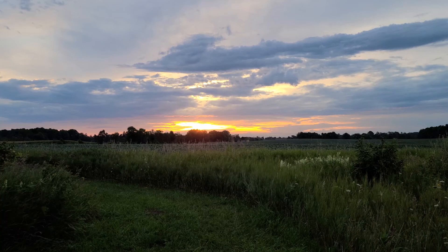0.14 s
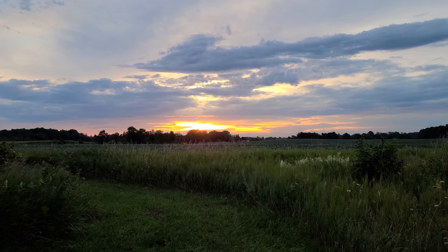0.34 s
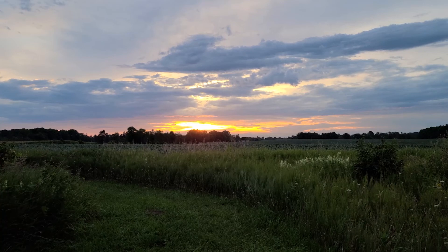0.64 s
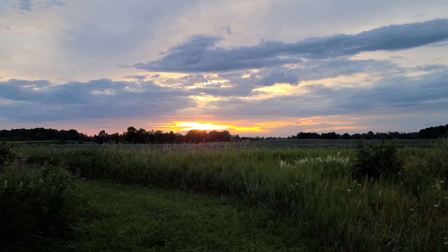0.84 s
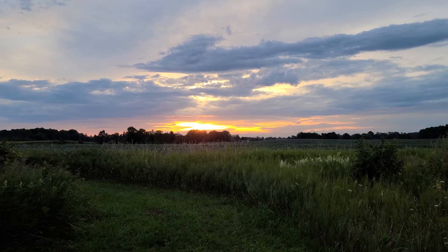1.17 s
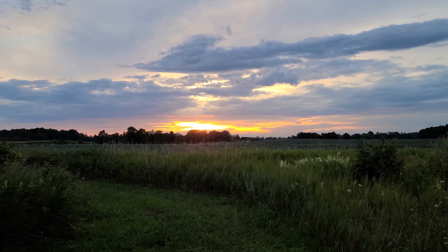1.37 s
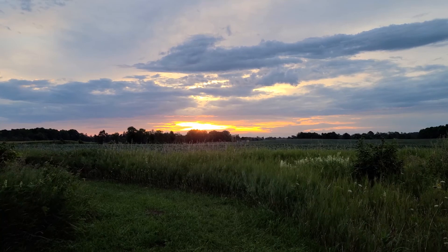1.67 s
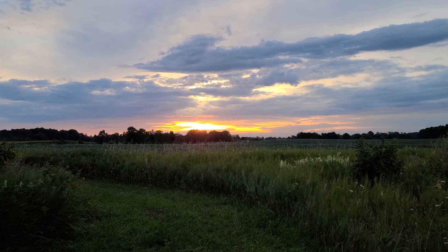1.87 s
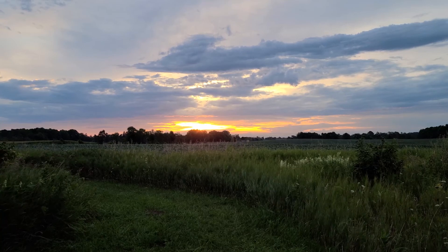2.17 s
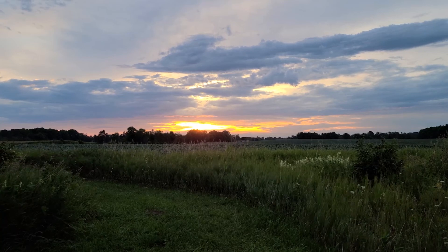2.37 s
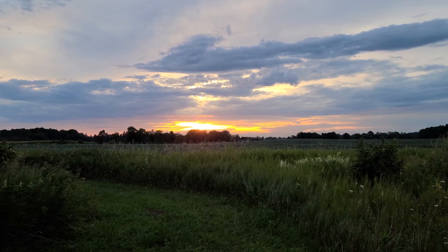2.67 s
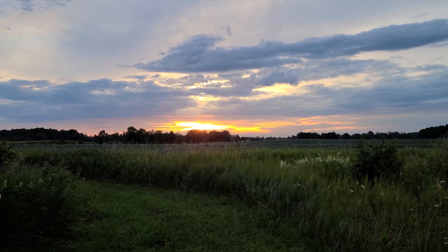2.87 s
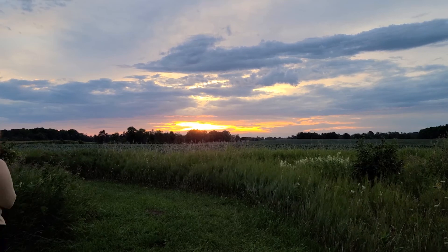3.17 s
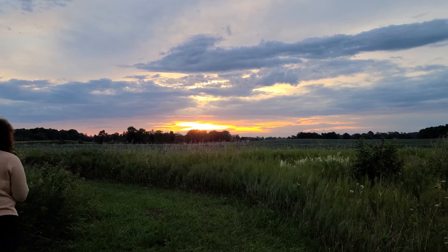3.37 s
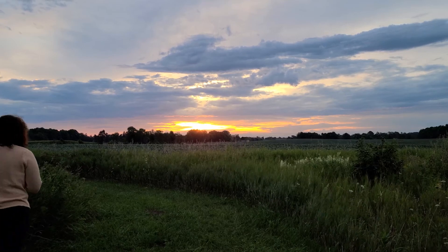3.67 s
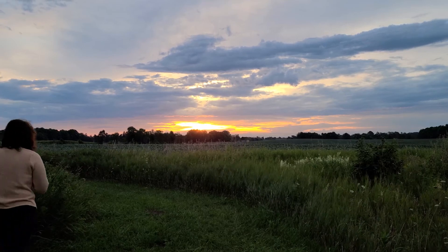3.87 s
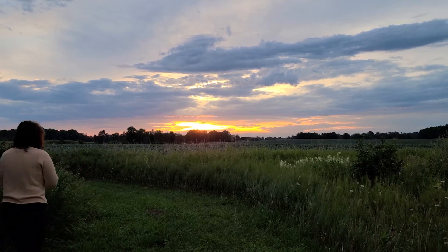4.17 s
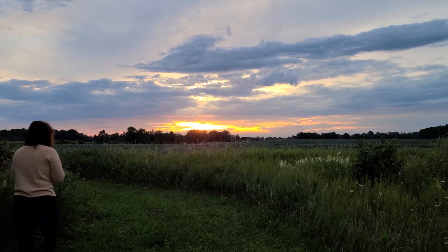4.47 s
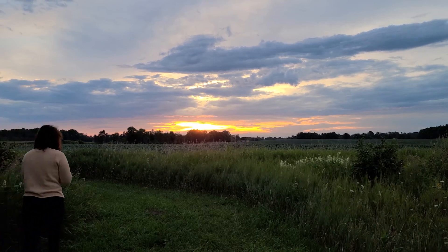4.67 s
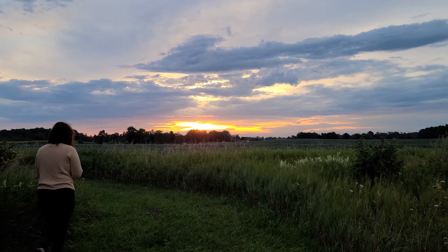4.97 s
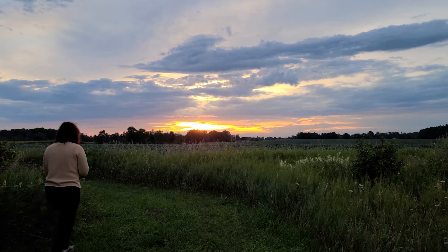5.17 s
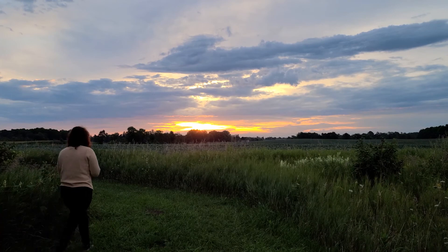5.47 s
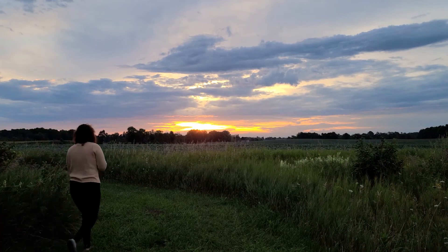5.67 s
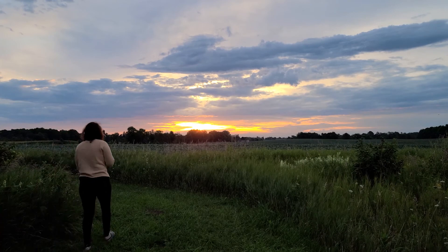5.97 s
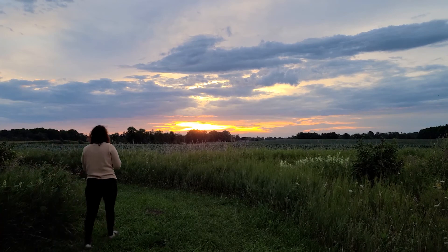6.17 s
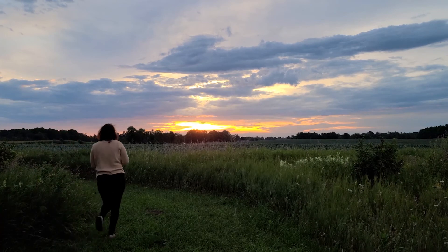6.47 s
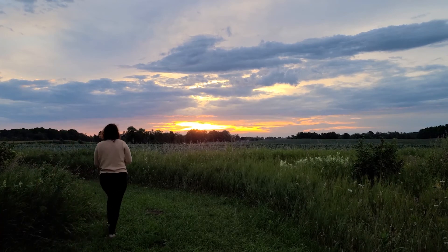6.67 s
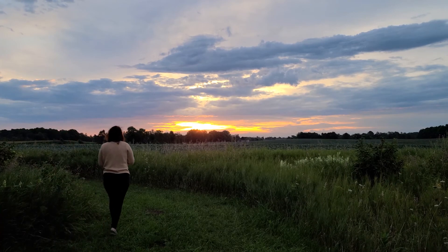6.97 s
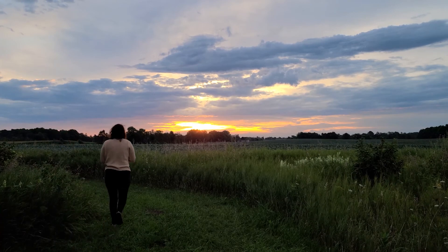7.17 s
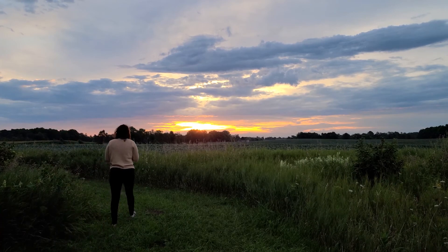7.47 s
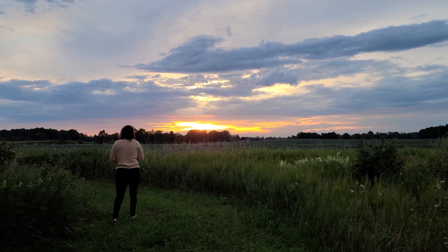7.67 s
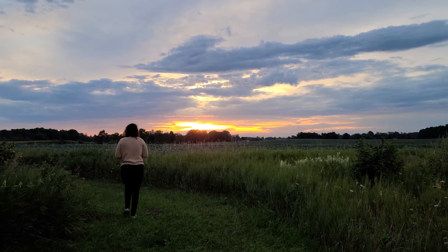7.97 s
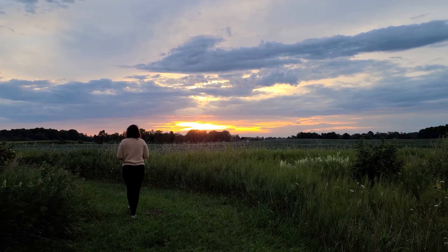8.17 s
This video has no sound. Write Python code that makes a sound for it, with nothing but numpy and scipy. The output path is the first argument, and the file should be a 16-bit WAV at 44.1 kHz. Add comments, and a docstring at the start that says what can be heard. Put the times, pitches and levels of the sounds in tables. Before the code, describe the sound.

Wind buffets the microphone in an open meadow throughout, a low, uneven rumble shifting between left and right. It thumps in the first half second, around 1.6 and 2.6 seconds, most strongly near 3.4, and again near 5 and 6.7. Distant birds start with quick falling chirps at about 2.3 seconds. A nearer sparrow sings two low-high whistled pairs at 3.7 and 4.2 seconds, a buzz at 4.6, then sharp notes and a quick trill ending near 5.8. Farther chips and twitters continue, growing busier from 7 seconds to the end, just past 8. Crickets pulse faintly and high all along. Very soft footsteps brush through grass, with a small dry stalk snap near 5 seconds. Behind everything lies a quiet wash of far traffic and leaves, with a faint wavering hum that swells around 4 and 4.5 seconds.

```python
"""Wind rumbles and thumps on two microphone ports, in an open meadow at dusk.
Eddies press on each port apart. A sparrow whistles, trills and buzzes on the right;
farther birds sweep and chip. Two crickets throb with wing strokes near 6 kHz, and someone
walks away on the left, bending grass and snapping stalks. Behind it all lie far traffic,
leaves, a blur of song and insects, and a wavering drone."""
import sys
import numpy as np
from scipy import signal
from scipy.fft import rfft, irfft
from scipy.io import wavfile
from scipy.ndimage import uniform_filter1d

SR = 44100
rng = np.random.default_rng(int(sys.argv[2]) if len(sys.argv) > 2 else 0)


def materialize(psi):
    """Save the field psi as 16-bit PCM at rate SR to the path in sys.argv[1].

    A 1-D psi becomes a single channel; in a 2-D psi each row is a channel.
    """
    bounded = np.clip(np.atleast_2d(psi).T, -1, 1)
    quanta = np.round(bounded * 32767).astype(np.int16)
    wavfile.write(sys.argv[1], SR, quanta)


N = 366912
TIME_S, BIN_HZ = np.arange(N) / SR, np.arange(N // 2 + 1) * SR / N

# gust strength: (time [s], level [dB], left minus right [dB])
GUSTS = [(0, -31.5, 5.5), (.45, -37, 0.5), (.56, -45.5, -5), (.86, -48, 0.5), (1, -43, 6), (1.5, -42.5, 2),
         (1.7, -39, 3), (2.7, -36.5, 4.5), (3.35, -31.5, -4.5), (3.6, -35, -4.5), (4.9, -40.5, 3.5),
         (5.2, -44, 2.5), (5.8, -37, -2), (6.25, -39, 3), (6.65, -33, -2), (6.85, -41.5, -1),
         (7.4, -39, 1.5), (7.5, -44.5, 2), (8.32, -42.5, -1)]
# buffeting spectrum: (frequency [Hz], density [dB])
BUFFET_SPECTRUM = [(12, -18), (30, -2.5), (60, 1.5), (85, -2), (125, -14.5), (190, -39), (400, -70.5)]
# fine eddies: (time [s], level [dB])
FLUTTER_LEVELS = [(0, -53), (.7, -62), (1.15, -48.5), (1.7, -55), (3.35, -57.5), (4.9, -65.5), (5.6, -60),
                  (8.32, -66.5)]
# single big eddies: (time [s], peak [dB], left minus right [dB])
BIG_EDDIES = [(0.096, -27.5, -14.5), (0.195, -26.5, -9), (0.404, -24, 1), (1.605, -28, 2), (2.642, -23, 8),
              (3.119, -26.5, -15), (3.317, -22.5, 16), (3.4, -20, -8), (3.85, -31, 19), (4.05, -30.5, 12),
              (4.944, -26, 5.5), (4.996, -25, -1), (6.695, -24.5, -4.5)]


def wind():
    """Bunched eddies press on each port; big ones thump, a finer flutter rides above."""
    gust_db, pan_db = curve(GUSTS)
    flutter_db, = curve(FLUTTER_LEVELS)
    shared = rng.standard_normal(N)
    bunching = undb(3.3 * walk(24))
    ports = []
    for side in (.5, -.5):
        eddies = (rng.standard_normal(N) + .4 * shared) * bunching
        rumble = unit(colour(eddies, BUFFET_SPECTRUM)) * undb(gust_db + side * pan_db)
        flutter_gain = undb(flutter_db + side * pan_db)
        for s, peak_db, balance_db in BIG_EDDIES:
            phase, thump_hz = rng.random(), rng.uniform(56, 86)
            span = slice(max(int((s - .1) * SR), 0), int((s + .2) * SR))
            t = TIME_S[span]
            push = undb(peak_db + side * balance_db) * bell(t - s - .015, .02)
            rumble[span] += push * np.sin(2 * np.pi * (thump_hz * t + phase))
            flutter_gain[span] += undb(-30) * push
        ports.append(rumble + flutter_gain * resonate(eddies, hz=162, width_hz=142))
    return np.array(ports)


# single whistles: (time [s], length [s], start [Hz], end [Hz], level [dB])
SPARROW_NOTES = [(3.28, 0.1, 6680, 7140, -58.5), (4.883, 0.0092, 4720, 5400, -49.5),
                 (4.886, 0.051, 4090, 3570, -46.5), (4.909, 0.019, 3640, 2840, -40),
                 (4.938, 0.029, 4900, 4870, -43), (4.969, 0.082, 6670, 7320, -52.5),
                 (5.602, 0.027, 3290, 1960, -57.5), (5.669, 0.038, 5800, 6400, -47),
                 (5.698, 0.074, 6120, 6350, -42.5)]
# low-high opening: (delay [s], length [s], start [Hz], end [Hz], level [dB])
OPENING_NOTES = [(-.005, 0.17, 2815, 2785, -50), (0.22, 0.0143, 4830, 6000, -52.5),
                 (0.225, 0.11, 5586, 5600, -44.5)]
# opening onsets: (time [s])
OPENINGS_S = [3.7, 4.158]
# trill syllable: (delay [s], length [s], start [Hz], end [Hz], level [dB])
TRILL_NOTES = [(-.007, 0.0075, 5160, 4850, -54.5), (0, 0.022, 4277, 4020, -45.5),
               (0.016, 0.078, 4180, 4090, -53), (0.018, 0.0204, 3510, 2880, -61.5),
               (0.086, 0.014, 7950, 7200, -58), (0.11, 0.07, 7800, 6900, -65)]


def sparrow():
    """The nearest bird: clear whistles, buzzes, hoarse top notes and a five-syllable trill."""
    trill_s, period_s, hoarse_above_hz = 5.0448, .1223, 6500
    trill = repeat(trill_s + period_s * np.arange(5), TRILL_NOTES)[:-2]  # last syllable breaks off
    low = [note for note in SPARROW_NOTES if note[2] <= hoarse_above_hz]
    high = [note for note in SPARROW_NOTES if note[2] > hoarse_above_hz]
    clear = whistle(low + repeat(OPENINGS_S, OPENING_NOTES), flutter_db=.63, taper=.55, rasp=0)
    hoarse = whistle(high + trill, flutter_db=1, taper=.97, rasp=.55)
    return place(clear + hoarse + buzz(), lag_ms=.41, pan_db=-.5, wet_db=-5.5, t60_s=.28)


# buzzed notes: (time [s], length [s], centre [Hz], resonance width [Hz], level [dB])
BUZZ_NOTES = [(3.106, 0.12, 3230, 725, -63.5), (3.71, 0.13, 2430, 250, -68), (4.138, 0.18, 2370, 250, -69),
              (4.581, 0.25, 4700, 840, -53.5), (4.592, 0.26, 3670, 613, -56.5),
              (6.985, 0.064, 6270, 400, -58), (8.227, 0.11, 3100, 1000, -61.5)]


def buzz():
    """Uneven noise pulses, about 140 a second, ring the sparrow's wide throat resonance."""
    out, ramp_s = 0, .023
    for s, length_s, hz, width_hz, db in BUZZ_NOTES:
        pulses = np.sqrt(.5 + .5 * np.cos(radians(140 + 12 * walk(30))))
        voice = resonate(pulses * rng.standard_normal(N), hz, width_hz)
        envelope = np.clip(np.minimum(TIME_S - s, s + length_s - TIME_S) / ramp_s, 0, 1)
        out += undb(db) * envelope * voice
    return out


# downward slides: (time [s], end [Hz], level [dB])
SWEEP_NOTES = [(2.42, 3180, -59), (2.558, 2780, -61), (2.673, 3600, -62.5), (7.111, 3320, -57.5),
               (7.16, 3600, -65), (7.243, 2900, -61.5), (7.36, 3700, -66.5)]
# short calls: (time [s], length [s], start [Hz], end [Hz], level [dB], side [left/right])
TWITTER_NOTES = [(2.291, 0.019, 3320, 2930, -60.5, "right"), (2.511, 0.042, 3500, 4000, -65.5, "left"),
                 (2.732, 0.05, 5050, 4580, -68, "right"), (2.85, 0.035, 4200, 3370, -63.5, "left"),
                 (2.811, 0.022, 4900, 4370, -66, "right"), (3.589, 0.011, 4080, 2930, -61, "left"),
                 (4.09, 0.026, 3350, 4350, -67, "left"), (6.974, 0.021, 3290, 2780, -63, "right"),
                 (7.423, 0.037, 2780, 4600, -65.5, "right"), (7.582, 0.045, 2560, 2480, -62, "right"),
                 (7.65, 0.13, 2300, 2270, -69.5, "right"), (7.661, 0.055, 4070, 3100, -60.5, "left"),
                 (7.684, 0.026, 7470, 6200, -62, "right"), (7.817, 0.064, 2550, 4900, -64, "left"),
                 (7.842, 0.052, 2970, 5180, -62.5, "left"), (8.056, 0.023, 4300, 3600, -63, "left"),
                 (8.071, 0.012, 8000, 7250, -63, "right"), (8.078, .017, 3680, 4260, -61, "left"),
                 (8.154, 0.011, 3050, 3750, -60.5, "left"), (8.233, 0.014, 2800, 3800, -61.5, "left")]
# onsets of four-chip runs: (time [s])
CHIP_ONSETS_S = [3.5574, 4.1187, 5.633, 6.08, 6.6172, 7.0684, 7.649]


def far_birds():
    """Sweeps, twitters and falling chips, with more scatter than the sparrow."""
    top_hz, fall_hz_per_s = 5010, 31000
    sweeps = [(s, (top_hz - hz) / fall_hz_per_s, top_hz, hz, db) for s, hz, db in SWEEP_NOTES]
    chip_period_s, chip_db, fade_db = .046, -60.5, 2
    run = [(k * chip_period_s, .018, 4930, 4420, chip_db - k * fade_db) for k in range(4)]
    right = [note[:-1] for note in TWITTER_NOTES if note[-1] == "right"]
    left = [note[:-1] for note in TWITTER_NOTES if note[-1] == "left"]
    right_song = whistle(sweeps + right, flutter_db=2, taper=.33)
    out = place(right_song, lag_ms=.4, pan_db=-1.2, wet_db=-1.5, t60_s=.3)
    left_song = whistle(left, flutter_db=1.65, taper=.11)
    out += place(left_song, lag_ms=.32, pan_db=3.8, wet_db=-1.5, t60_s=.25)
    chips = whistle(repeat(CHIP_ONSETS_S, run), flutter_db=1.4, taper=.45)
    return out + place(chips, lag_ms=.28, pan_db=-.72, wet_db=-1.5, t60_s=.26)


# two crickets: (chirp rate [1/s], start phase [cycles], pitch [Hz])
CRICKET_VOICES = [(11.95, .75, 6170), (11.96, .1, 6380)]
# their loudness: (time [s], first [dB], second [dB])
CRICKET_LEVELS = [(0, -74, -92), (3, -74.5, -84), (4.5, -75, -75), (5.6, -84, -74.5), (7, -78, -73),
                  (7.5, -73, -73), (8.32, -72.5, -73)]


def crickets():
    """Each chirp is a few wing strokes that sag in pitch."""
    out = 0
    for (rate_hz, phase, hz), db in zip(CRICKET_VOICES, curve(CRICKET_LEVELS)):
        cycle = (rate_hz * TIME_S + phase + .5) % 1 - .5
        strokes = bell(cycle, .12) * (1 + .6 * np.cos(2 * np.pi * 14 * cycle))
        tone = np.sin(radians(hz - 900 * cycle + 25 * walk(25) + 90 * walk(300)))
        chirps = unit(strokes * tone) * undb(db + 1.2 * walk(15))
        out += place(chirps, lag_ms=.43, pan_db=-1, wet_db=.5, t60_s=.09)
    return out


# feet brushing grass: (peak time [s], length [s], level [dB])
FOOTSTEPS = [(0.643, 0.47, -74.5), (1.524, 0.075, -65), (2.32, 0.2, -70.5), (3.095, 0.12, -75),
             (3.953, 0.25, -75.5), (4.545, 0.077, -73), (4.66, 0.99, -79), (5.317, 0.41, -76.5),
             (6.016, 0.15, -71.5), (6.726, 0.071, -74), (7.39, 0.071, -71.5)]
# dry stalks breaking: (time [s], peak [dB])
STALK_SNAPS = [(2.374, -61), (4.991, -47)]
# grass spectrum: (frequency [Hz], density [dB])
GRASS_SPECTRUM = [(500, -7), (2000, -2), (4000, 0), (9000, -6.5), (12500, -7), (16000, -10)]


def walker():
    """Bending blades crackle at each step, over a rustle that fades with distance."""
    effort = undb(-78.5 - .57 * TIME_S + 1.5 * walk(1.89))
    for s, length_s, db in FOOTSTEPS:
        steepness = np.where(TIME_S < s, 1.6, 3)  # swells, then stops short
        effort += undb(db) * bell(steepness * (TIME_S - s), length_s)
    effort *= undb(1.8 * walk(60))
    grains = [rng.standard_normal(N) * undb(2.5 * rng.exponential(size=N)) for _ in range(3)]
    near, *diffuse = (effort * unit(colour(g, GRASS_SPECTRUM)) for g in grains)
    for s, db in STALK_SNAPS:
        decay = (TIME_S > s) * np.exp(-np.abs(TIME_S - s) / .0008)
        near += undb(db) * decay * unit(colour(rng.standard_normal(N), GRASS_SPECTRUM))
    direct = np.array([near, np.roll(near, round(.00016 * SR))])  # left port first
    return (direct + undb(2) * np.array(diffuse)) * undb([[-1], [1]])


def chatter():
    """Many far birds: faint quick sweeps at random moments."""
    draws = rng.uniform([0, 3200, -.7], [8.2, 5100, .3], (160, 3))
    notes = [(s, .025, hz, hz * (1 + .25 * glide), -75) for s, hz, glide in draws]
    return place(whistle(notes, flutter_db=3, taper=1), lag_ms=-.25, pan_db=0, wet_db=0, t60_s=.3)


# background spectrum: (frequency [Hz], density [dB])
AMBIENCE_SPECTRUM = [(70, -49), (130, -15.5), (400, -10.5), (810, -19), (950, -22), (2150, -30.5),
                     (3000, -30), (5200, -27), (7000, -26.5), (8100, -53.5), (15600, -46)]
# likeness at the two ports: (frequency [Hz], shared power [0-1])
AMBIENCE_COHERENCE = [(330, 1), (600, 0.5), (1500, 0.022), (5000, 0.35)]


def ambience():
    """Far traffic and leaves below, a blur of distant song and insects above."""
    share = np.clip(per_bin(AMBIENCE_COHERENCE), 0, 1)
    common = rfft(rng.standard_normal(N))
    left_lag_s = .000365 * np.minimum(BIN_HZ / 900, 1)  # bass from ahead, treble from the right
    arrivals = np.array([common * np.exp(-2j * np.pi * BIN_HZ * left_lag_s), common])
    ports = np.sqrt(share) * arrivals + np.sqrt(1 - share) * rfft(rng.standard_normal((2, N)))
    blur = irfft(ports * undb(per_bin(AMBIENCE_SPECTRUM)), N)
    return unit(blur) * undb(-59 + .33 * walk(1.86))


# drone swells: (time [s], level [dB])
DRONE_SWELLS = [(4, -59), (4.52, -62)]


def drone(hz=398, base_db=-69, half_swell_s=.13):
    """A far tone wavers and swells twice."""
    tone = unit(np.sin(radians(hz + 3 * walk(12)))) * undb(3 * walk(4))
    swells = sum(undb(db) * bell(TIME_S - s, half_swell_s) for s, db in DRONE_SWELLS)
    return tone * (undb(base_db) + swells)


def vehicle():
    """A far vehicle's hiss swells and fades at the start."""
    hiss = unit(band(rng.standard_normal((2, N)), hz=860, width_hz=400))
    return hiss * undb(-67) * bell(TIME_S - .4, .46)


def whistle(notes, flutter_db, taper, rasp=.4):
    """Near-sine bird glides; moving air flutters the level, rasp (0-1) shakes pitch and level fast."""
    out = np.zeros(N + SR)
    waver = 1 + (.003 + .022 * rasp) * walk(350)
    for s, length_s, start_hz, end_hz, db in notes:
        k, n = int(s * SR), int(length_s * SR)
        t = np.arange(n) / SR
        held = length_s > .08  # held notes fade
        scooped = held and start_hz > 4000  # high ones also start fast and rise to pitch
        hz = np.linspace(start_hz, end_hz, n) * (1 - scooped * .04 * np.exp(-t / .0045))
        envelope = signal.windows.tukey(n, taper * (.3 if scooped else 1))
        envelope *= undb(db - 6 * held * t / length_s)
        out[k:k + n] += np.sqrt(2) * envelope * np.sin(radians(hz * waver[k:k + n]))
    return out[:N] * undb(flutter_db * walk(60)) * undb(6 * rasp * walk(300))


def place(x, lag_ms, pan_db, wet_db, t60_s):
    """Stems and bushes scatter a tail, a hedge sends one echo. Lag and pan are left minus right."""
    t = np.arange(int(.4 * SR)) / SR
    tail = rng.standard_normal((2, len(t))) * 1000 ** (-t / t60_s)
    echo = int(.052 * SR)
    tail[:, echo:echo + 40] *= 5.5
    wet = signal.fftconvolve(x[None], tail / np.linalg.norm(tail[0]), axes=1)[:, :N]
    direct = np.array([np.roll(x, round(lag_ms * SR / 1000)), x])
    return (direct + undb(wet_db) * wet) * undb([[pan_db / 2], [-pan_db / 2]])


def repeat(onsets_s, notes):
    return [(s + delay_s, *note) for s in onsets_s for delay_s, *note in notes]


def undb(db):
    return 10 ** (np.asarray(db) / 20)


def unit(x):
    return x / np.sqrt(np.mean(x ** 2))


def bell(x, half_width):
    return np.exp(-(x / half_width) ** 2)


def radians(hz):
    return 2 * np.pi * np.cumsum(hz) / SR


def curve(rows):
    """Columns of a time table, one value a sample."""
    s, *columns = np.transpose(rows)
    return [np.interp(TIME_S, s, column) for column in columns]


def per_bin(points):
    """(Hz, value) points interpolated on a log axis."""
    hz, value = np.transpose(points)
    return np.interp(np.log(BIN_HZ + 1), np.log(hz), value)


def colour(x, spectrum):
    return irfft(rfft(x) * undb(per_bin(spectrum)), N)


def band(x, hz, width_hz):
    return signal.lfilter(*signal.iirpeak(hz, hz / width_hz, SR), x)


def resonate(x, hz, width_hz):
    """Two band-passes in series, at unit RMS."""
    return unit(band(band(x, hz, width_hz), hz, width_hz))


def walk(rate_hz):
    """Random held levels, smoothed twice; spread near 1."""
    k = int(SR / rate_hz)
    held = np.repeat(rng.standard_normal(N // k + 1), k)
    return 1.3 * uniform_filter1d(uniform_filter1d(held, k), k)[:N]


def scene():
    return (wind() + ambience() + drone() + vehicle()
            + sparrow() + far_birds() + chatter() + crickets() + walker())


def record(dry):
    """The recorder cuts the top."""
    cutoff_hz = 15620
    return signal.sosfilt(signal.ellip(10, .2, 70, cutoff_hz, fs=SR, output="sos"), dry)


dry = scene()
out = record(dry)
materialize(out)
```